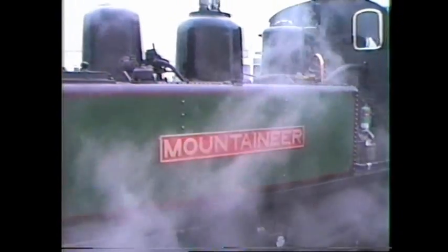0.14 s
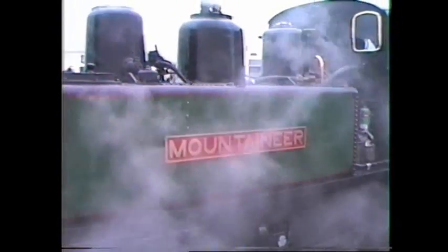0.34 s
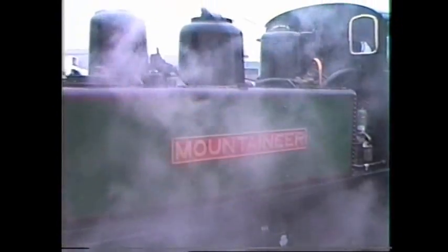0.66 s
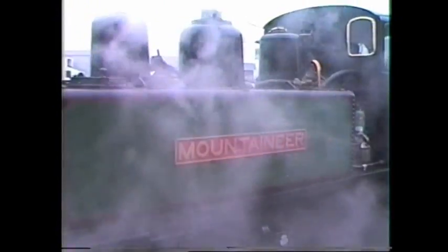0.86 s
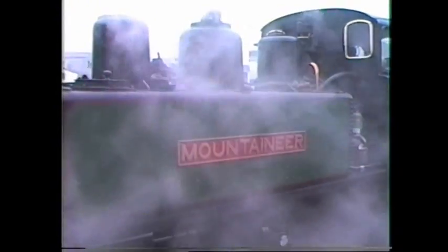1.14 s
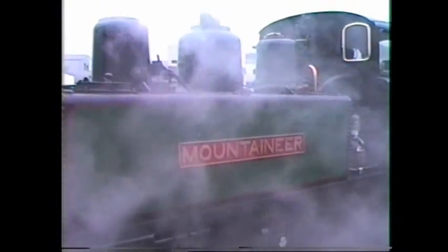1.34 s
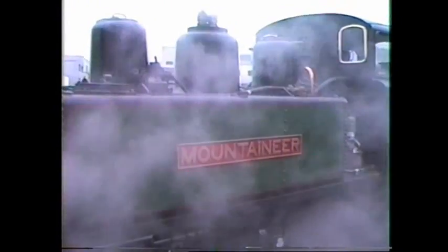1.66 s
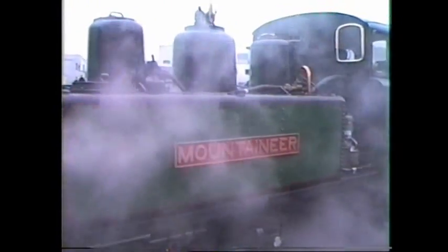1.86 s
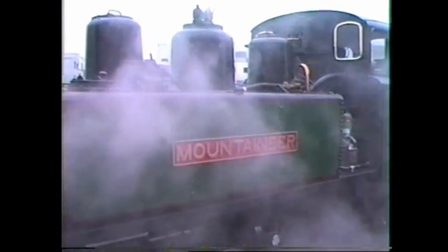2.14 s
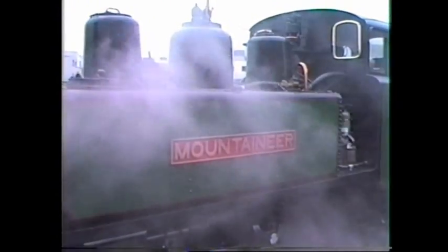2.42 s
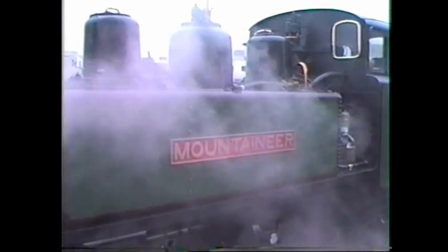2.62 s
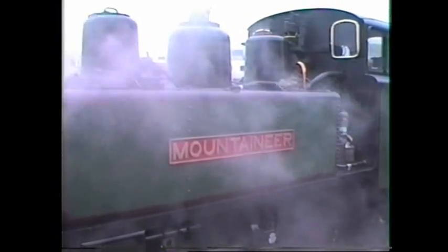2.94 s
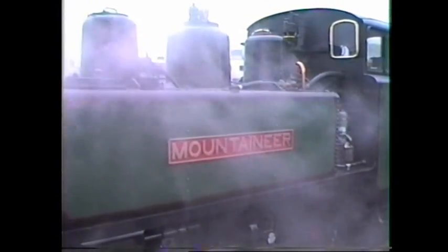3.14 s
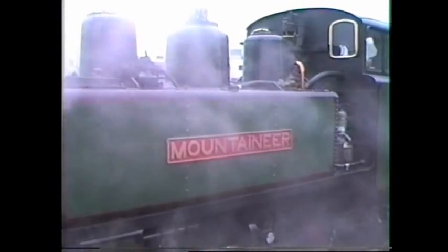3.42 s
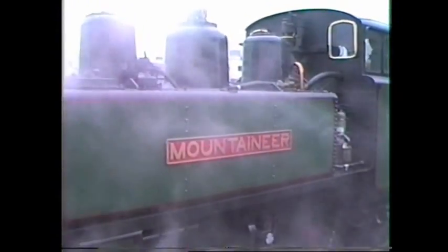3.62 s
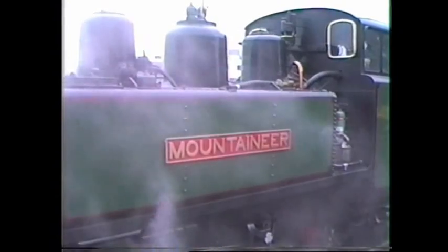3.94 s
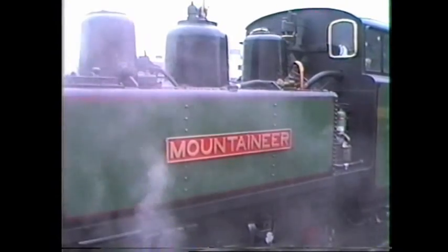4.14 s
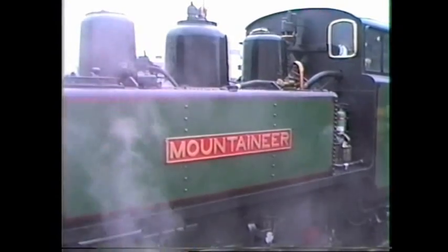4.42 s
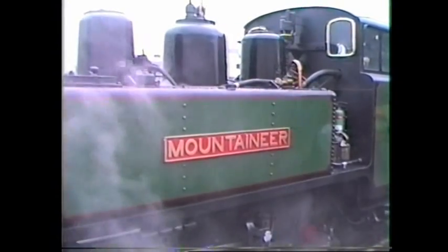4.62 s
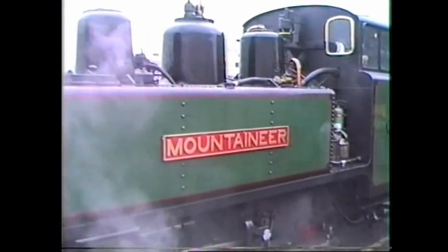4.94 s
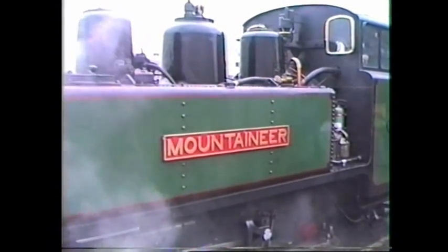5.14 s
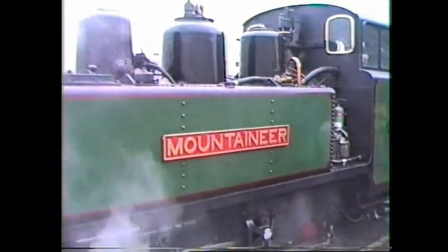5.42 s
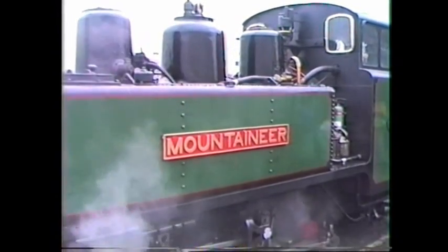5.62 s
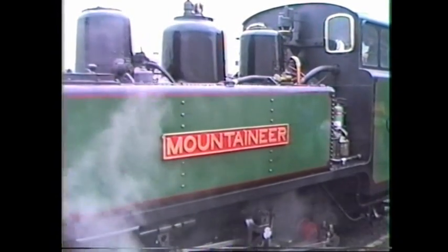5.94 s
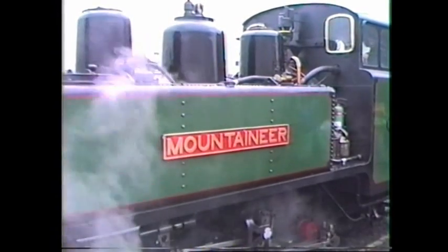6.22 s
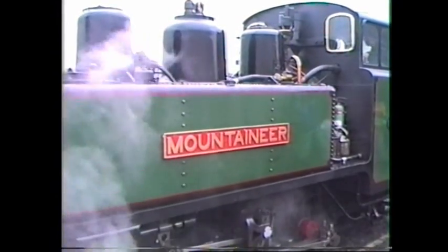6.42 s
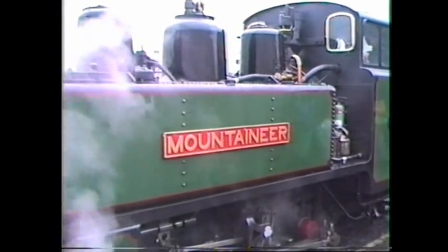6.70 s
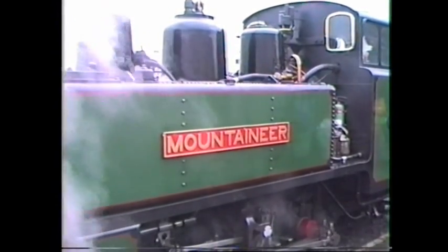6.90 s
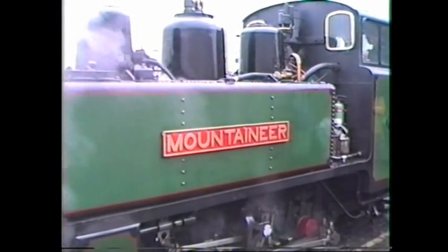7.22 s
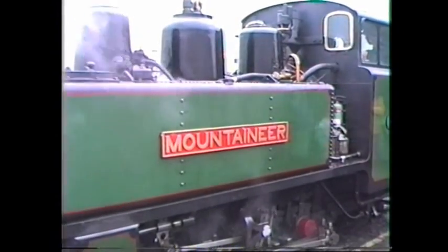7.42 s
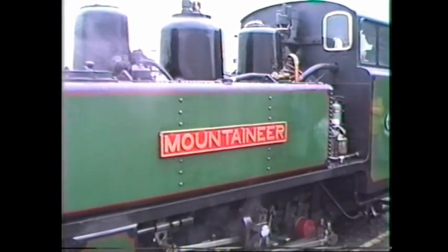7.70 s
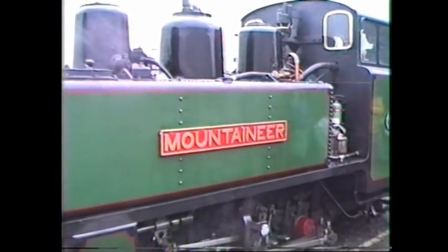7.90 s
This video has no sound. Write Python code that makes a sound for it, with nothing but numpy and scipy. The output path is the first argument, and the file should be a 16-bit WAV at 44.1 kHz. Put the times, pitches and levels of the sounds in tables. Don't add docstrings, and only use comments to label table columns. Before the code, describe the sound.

Steam blows steadily and loudly from a small standing locomotive a few paces away, its hiss shifting between hollow and bright, then cutting to low road rumble.

```python
import sys
import numpy as np
from scipy import signal
from scipy.fft import rfft, irfft
from scipy.io import wavfile
from scipy.ndimage import uniform_filter1d

SR = 44100
rng = np.random.default_rng(int(sys.argv[2]) if len(sys.argv) > 2 else 0)


def makeup_ratio(level_db):
    decades = np.asarray(level_db, float) / 20
    return 10 ** decades


def int16_out(signal):
    q = np.round(np.clip(np.atleast_2d(signal).T, -1, 1) * 32767)
    wavfile.write(sys.argv[1], SR, q.astype(np.int16))


N = 355446

# start_s, level_db
JET_LEVEL = [(0.0, -22.5), (0.09, -22), (0.45, -22.5), (0.56, -21), (1.03, -22.5), (3.91, -23),
             (4.52, -21.5), (4.76, -24.5), (5.21, -23), (6.26, -22), (6.55, -23), (6.95, -22),
             (8.03, -22.5)]
# pitch_hz, level_db
JET_SPECTRUM = [(300, -21.5), (460, -6.5), (600, 12.5), (1000, 11.5), (2000, 12.5), (3500, 2.5),
                (6500, -15), (7400, -25.5), (9000, -25), (11500, -31), (13500, -58)]
# pitch_hz, width_hz, level_db
FIXED_RESONANCES = [(479.6, 36, -13), (652, 292, -15.5), (810, 30, -8.5), (835, 31, 5), (928, 118, -17),
                    (1084, 61.4, -16), (1259, 122, -12.5), (1595, 553, -13), (1660, 43, -1), (1918, 32, -6.5),
                    (2121, 233, -10), (2315, 55, -7.5), (2491, 85, -13), (2753, 710, -5.5), (3307, 370, -8.5),
                    (3515, 59, -17.5), (4350, 162, 3), (5025, 500, 7.5), (5460, 43, -3.5), (5965, 700, 8.5),
                    (6750, 720, 11.5), (7854, 660, 11.5), (8650, 320, 6), (9600, 245, 4.5), (10530, 428, 3.5),
                    (12211, 699, 0),
                    (358, 16, 3.5), (600, 47, 0.5), (780, 60, 1.5), (1029, 15, 4.5), (1406, 42, 2), (2017, 50, 2),
              (2316, 41, 3), (2375, 36, 2.5), (2490, 46, 0.5), (2546, 40, 6), (2850, 43, 2), (3536, 50, 3),
              (3530, 90, 2.5), (5860, 80, 1), (7000, 110, 0)]
# pitch_hz, level_db
HOLLOW_MINUS_BRIGHT = [(300, 8), (500, 7.5), (900, 5.5), (1500, -6), (3000, 9.5), (5500, -12), (7500, -7.5),
                       (9500, -0.5), (13500, -1)]
# pitch_hz, width_hz, level_db
VENT_PIPES = [(1495, 135, 5.9), (1630, 48, 6.5), (2000, 67, -1.5), (2476, 305, -11.5), (2880, 21, -5),
              (3023, 93, -11.5), (3515, 64, 15), (3460, 360, -16.5), (3530, 41, 4), (3876, 280, 10),
              (5154, 500, 17), (5630, 100, 9.5), (6200, 340, 4.5), (8360, 440, -13), (8420, 504, 13),
              (11321, 191, 3.1)]
# pitch_hz, level_db
BOTH_COLOUR = [(300, 3), (500, -2.5), (900, 2), (1500, 5.5), (3000, 2.5), (5500, -1.2), (7500, 1),
               (9500, -0.2), (13500, 2)]
# pitch_hz, width_hz, level_db
BOTH_RESONANCES = [(1750, 43, -7), (2220, 97, -7), (3630, 250, 7), (4580, 75, 14), (5460, 28, 25),
                   (6630, 333, -3)]
# start_s, vent headed for (-0.5 bright .. 0.5 hollow), settling_s, peak overlap (0-1)
VALVE_SWAPS = [
    (.36, -0.57, 0.58, .85),
    (4.2, 0.48, 0.51, 0.9),
    (7.1, 0.29, .6, .08),
]
# start_s, level_db
WATER_SLUGS = [
    (0, 2),
    (4.2, 6),
    (4.87, 7.5),
]
# centre_s, level_db
COCK_SPELLS = [
    (.55, 4.5),
    (5.4, -4.5),
    (6.4, 2.5),
    (7.2, -2.5),
]
# pitch_hz, level_db
ROAD_SPECTRUM = [(30, -12), (90, -11), (130, -4), (175, 0), (260, -19), (400, -14), (2000, -16.5),
                 (5000, -24), (15000, -65)]
# pitch_hz, level_db
FLOOR_SPECTRUM = [(20, -5), (50, 5.5), (110, -2.5), (200, 1.5), (280, -5.5), (500, -9), (3000, -20.5),
                  (12000, -30), (13300, -36), (14000, -38), (14600, -37), (15700, -34)]
# pitch_hz, level_db (rms), waver_db
CAMERA_TONES = [
    (24.6, -66.5, 0.5),
    (15625, -90, 1),
]

FIRST_VENT, CREEP_PER_S = 0.56, 0.03
OVERLAP_RISE_S, OVERLAP_FALL_S, OVERLAP_REST = 0.15, 0.37, 0.05
PIPE_LAG_S = 0.065
SLUG_RISE_S, SLUG_FALL_S = 0.034, 0.3
ARRIVAL_DB, ARRIVAL_S = 0.5, 0.15
SPELL_S = 0.31
ROAD_DB, CUT_S = -27.5, 8.038
FLOOR_DB = -54.5
MAINS_HZ, MAINS_DB, MAINS_WAVER_DB = 50.3, -68, 3.5
SIZE, HOP = 2048, 512


def steam():
    jet = noise(jet_field())
    low_pass = signal.butter(2, 3500, fs=SR, output="sos")
    low = signal.sosfiltfilt(low_pass, jet)
    treble = jet - low
    shake_db = 0.2 * wander(1.8, 68)
    treble_shake_db = 0.51 * wander(3, 45)
    jet = low * makeup_ratio(shake_db) + treble * makeup_ratio(shake_db + treble_shake_db)
    start_s, level_db = np.transpose(JET_LEVEL)
    return jet * makeup_ratio(np.interp(np.arange(N) / SR, start_s, level_db))


def jet_field():
    hz, t = grid()
    vent, both = valve(t)
    late_vent, _ = valve(t - PIPE_LAG_S)
    field = (read(JET_SPECTRUM, hz) + bumps(FIXED_RESONANCES, hz))[:, None]
    field = field + np.outer(read(HOLLOW_MINUS_BRIGHT, hz), vent)
    field = field + np.outer(bumps(VENT_PIPES, hz), late_vent)
    field = field + np.outer(read(BOTH_COLOUR, hz) + bumps(BOTH_RESONANCES, hz), both)
    field = field + np.outer(bumps([(680, 390, 0.82)], hz), roar_db(t))
    field = field + np.outer(bumps([(2780, 220, 0.94)], hz), nearest_cock_db(t))
    field = field - 14 * np.maximum(np.log2(300 / (hz + 1)), 0)[:, None]
    field = field - 60 * np.maximum(np.log2((hz + 1) / 13500), 0)[:, None]
    chance = rng.standard_normal((len(t), len(hz), 2)).T
    eddies = drifting(chance[0], bins=24, frames=8)
    cloud = drifting(chance[1], bins=4, frames=70)
    field = field + 0.5 * eddies + 1.87 * cloud
    frame_power = (makeup_ratio(field) ** 2).mean(0)
    return field - 10 * np.log10(frame_power)


def valve(t):
    vent, both, was = FIRST_VENT + 0 * t, OVERLAP_REST + 0 * t, FIRST_VENT
    for start_s, goal, settling_s, overlap in VALVE_SWAPS:
        since = t - start_s
        vent = vent + (goal - was) * (1 - np.exp(-np.maximum(since, 0) / settling_s))
        both = both + 1.73 * overlap * surge(since, OVERLAP_RISE_S, OVERLAP_FALL_S)
        was = goal
    start, end = VALVE_SWAPS[0][0], VALVE_SWAPS[1][0]
    creep = CREEP_PER_S * np.clip(t - start, 0, end - start)
    creep = creep * np.exp(-np.maximum(t - end, 0) / VALVE_SWAPS[1][2])
    return vent + creep, both


def roar_db(t):
    total = 0 * t
    for start_s, level_db in WATER_SLUGS:
        swell = level_db * surge(t - start_s, SLUG_RISE_S, SLUG_FALL_S)
        arrival = ARRIVAL_DB * np.exp(-((t - start_s) / ARRIVAL_S) ** 2)
        total = total + swell + arrival
    return total


def nearest_cock_db(t):
    return sum(level_db * np.exp(-((t - centre_s) / SPELL_S) ** 2) for centre_s, level_db in COCK_SPELLS)


def road():
    hz, t = grid()
    rumble = noise(read(ROAD_SPECTRUM, hz)[:, None] + 0 * t)
    return makeup_ratio(ROAD_DB) * rumble / np.std(rumble[round(CUT_S * SR):])


def yard_and_hiss():
    hz, t = grid()
    return makeup_ratio(FLOOR_DB) * noise(read(FLOOR_SPECTRUM, hz)[:, None] + 0 * t)


def camera_hum():
    t = np.arange(N) / SR
    level_db = MAINS_DB + MAINS_WAVER_DB * wander(0.3, 4)
    total = np.sqrt(2) * makeup_ratio(level_db) * np.sin(2 * np.pi * MAINS_HZ * t)
    for pitch_hz, tone_db, waver_db in CAMERA_TONES:
        level_db = tone_db + waver_db * wander(0.2, 1.8)
        total = total + np.sqrt(2) * makeup_ratio(level_db) * np.sin(2 * np.pi * (pitch_hz * t + rng.random()))
    return total


def treble_smear(x):
    shift = 270
    hz, t, z = signal.stft(np.roll(x, -shift), SR, nperseg=SIZE, noverlap=SIZE // 2)
    often = uniform_filter1d(rng.standard_normal(len(t)), size=2) > 0.3
    patches = rng.random((len(t), 9)).T > 0.4
    band = (hz // 340).astype(int) % 9
    mask = makeup_ratio(-1.5) * np.outer(abs(hz - 12500) < 450, often) * patches[band]
    count = 10
    for low_hz, when in zip(np.geomspace(4300, 10000, count), rng.random(count)):
        mask[(hz > low_hz) & (hz < low_hz * 1.17), int(when * len(t))] = makeup_ratio(-2)
    turn = np.exp(2j * np.pi * rng.random(z.shape[::-1]).T)
    side = signal.istft(z * mask * turn, SR, nperseg=SIZE, noverlap=SIZE // 2)[1][:N]
    return np.roll(side, shift)


def surge(since, rise, fall):
    since = np.maximum(since, 0)
    return (1 - np.exp(-(since / rise) ** 2)) * np.exp(-since / fall)


def drifting(chance, bins, frames):
    return evened(uniform_filter1d(uniform_filter1d(chance, size=bins, axis=0), size=frames, axis=1))


def wander(low_hz, high_hz):
    hz = np.fft.rfftfreq(N, 1 / SR)
    shape = (hz > low_hz) / np.sqrt(hz + 1) / (1 + (hz / high_hz) ** 4)
    return evened(irfft(rfft(rng.standard_normal(N)) * shape, N))


def noise(field_db):
    real, imag = rng.standard_normal(field_db.shape[::-1] + (2,)).T
    spectra = (real + 1j * imag) * makeup_ratio(field_db)
    return evened(signal.istft(spectra, nperseg=SIZE, noverlap=SIZE - HOP)[1][:N])


def grid():
    return np.fft.rfftfreq(SIZE, 1 / SR), np.arange(N // HOP + 3) * HOP / SR


def read(points, hz):
    pitch_hz, level_db = np.transpose(points)
    return np.interp(np.log(hz + 1), np.log(pitch_hz + 1), level_db)


def bumps(modes, hz):
    return sum(db / (1 + (2 * (hz - f) / width) ** 2) for f, width, db in modes)


def evened(x):
    return x / np.sqrt(np.mean(x ** 2) + 1e-20)


def scene():
    t = np.arange(N) / SR
    before = np.clip((CUT_S - t) / 0.003, 0, 1)
    after = np.clip((t - CUT_S + 0.0091) / 0.015, 0, 1)
    mono = (steam() + yard_and_hiss()) * before + road() * after + camera_hum()
    return np.array([mono, mono])


def band_limit(x):
    return signal.sosfilt(signal.butter(12, 16840, fs=SR, output="sos"), x)


def record(dry):
    square = dry ** 2
    bent = dry + 0.05 * (square - uniform_filter1d(square, size=200, axis=1))
    bent = 0.61 * np.tanh(bent / 0.59)
    edge = signal.firwin(1023, 15750, window=("kaiser", 9), fs=SR)
    taped = signal.oaconvolve(bent, edge[None], "same")
    wide = taped + np.outer([1, -1], treble_smear(taped[0]))
    return band_limit(wide)


dry = scene()
out = record(dry)
int16_out(out)
```